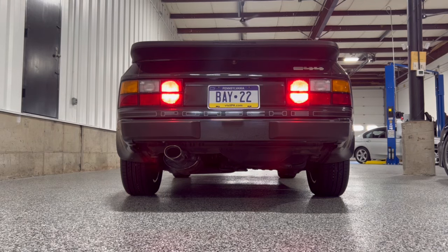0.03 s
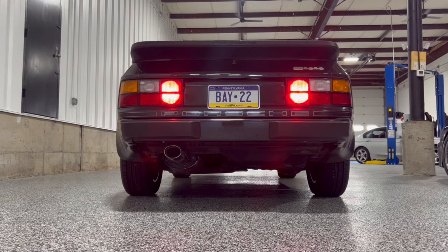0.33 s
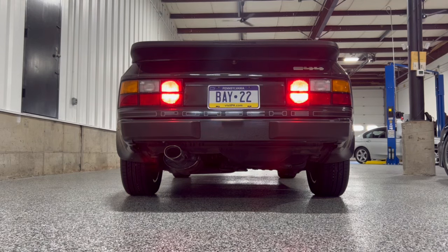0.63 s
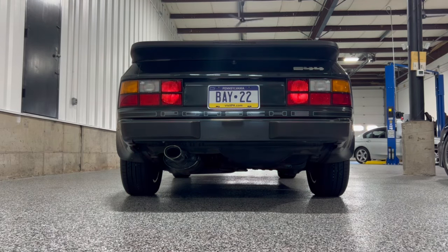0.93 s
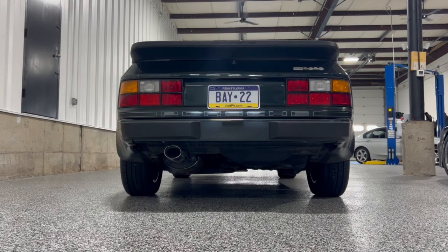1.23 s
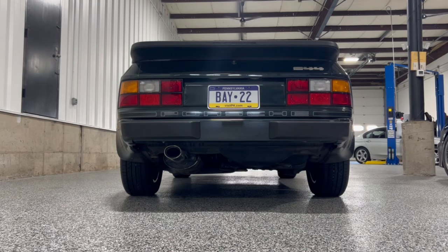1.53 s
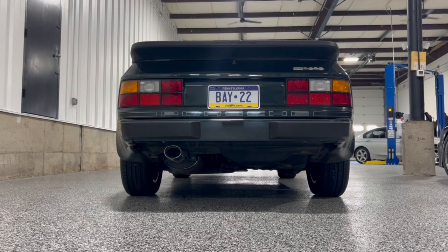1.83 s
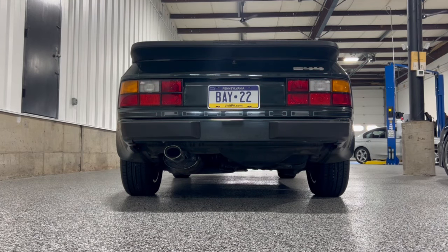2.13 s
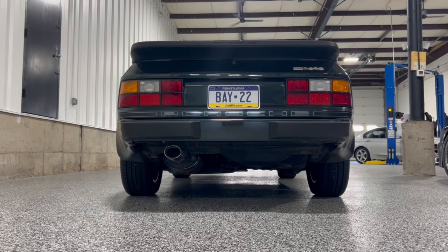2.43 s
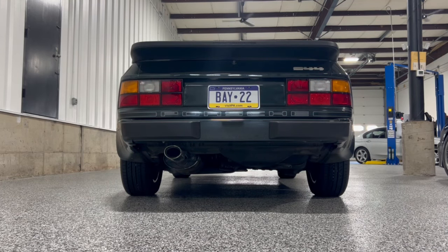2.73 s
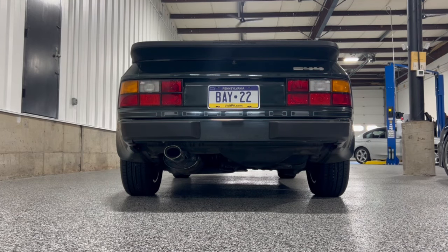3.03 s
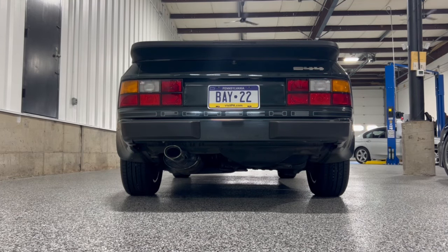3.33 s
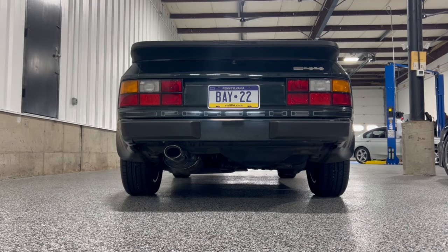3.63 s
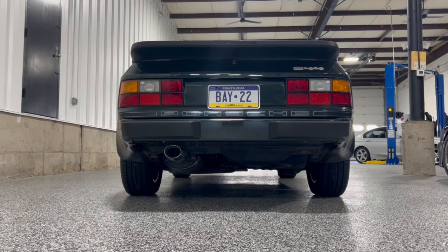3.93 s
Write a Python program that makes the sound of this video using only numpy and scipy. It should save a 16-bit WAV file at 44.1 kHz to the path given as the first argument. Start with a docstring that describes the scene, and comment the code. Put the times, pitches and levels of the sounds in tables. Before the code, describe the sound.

A car engine idles, then shuts off, followed by clacks and dull thuds in a workshop.

```python
"""A car is switched off in a workshop

A four-cylinder car idles, heard from behind: its firings make the tailpipe throb and burble, while
belts whirr and valves tick. It is switched off, turns over a few more times, puffing without firing,
and comes to rest with a clunk. Latch-like clacks and dull thuds follow over the hum of the large hall."""
import sys
import numpy as np
from scipy import signal
from scipy.fft import rfft, irfft
from scipy.io import wavfile
from scipy.ndimage import uniform_filter1d

SR = 44100
rng = np.random.default_rng(int(sys.argv[2]) if len(sys.argv) > 2 else 0)


def wav_out(sig):
    """Save sig, one row per channel (or a flat mono array), as 16-bit PCM at SR to the path in sys.argv[1]."""
    wavfile.write(sys.argv[1], SR, np.round(np.clip(np.atleast_2d(sig).T, -1, 1) * 32767).astype(np.int16))


N = 176400
T = np.arange(N) / SR


def from_db(db):
    return 10 ** (np.asarray(db) / 20)


def rms_one(x):
    """Scale a signal so that its average power is 1."""
    return x / np.sqrt(np.mean(x ** 2) + 1e-20)


def in_time(rows):
    """Join (time, values...) rows into one curve per value column."""
    times, *columns = np.transpose(rows)
    return [np.interp(T, times, column) for column in columns]


def at_hz(points, hz):
    """Read between (frequency, value) points on a musical pitch scale."""
    frequencies, values = np.transpose(points)
    return np.interp(np.log(hz + 1), np.log(frequencies), values)


def drift(per_s):
    """A slow random wobble, about 1 in size."""
    knots = rng.standard_normal(400)
    return np.interp(T * per_s, np.arange(len(knots)), knots)


def dying(start, t60):
    """Stay at 1 until start, then fade by 60 dB every t60 seconds (the fade time)."""
    return from_db(-60 * np.maximum(T - start, 0) / t60)


def noise(spectrum=None):
    """Stereo noise of a given colour: alike on both sides in the bass, wider higher up,
    opposite near 9.5 kHz and alike again near 13 kHz, with a few short echoes."""
    # how alike left and right are: (frequency [Hz], likeness [1 = same, -1 or less = opposite])
    likeness = [(60, 0.86), (170, 0.77), (420, 0.87), (730, -0.061), (1200, 0.35), (1970, 0.19),
                (5400, -0.019), (8500, 0.13), (9300, -1.13), (10100, -1.01), (11000, 0.076), (12300, 0.63),
                (13700, 1), (14300, -0.049)]
    echo_delays_s = (.0017, .0031, .0052, .0083)
    echo_share = .35
    hz = np.arange(N // 2 + 1) * SR / N
    alike = np.clip(at_hz(likeness, hz), -1, 1)
    mid, diffuse = rfft(rng.standard_normal((2, N)))
    echoes = sum((-1) ** k * np.exp(-2j * np.pi * hz * s) for k, s in enumerate(echo_delays_s))
    side = np.sqrt(echo_share / len(echo_delays_s)) * echoes * mid + np.sqrt(1 - echo_share) * diffuse
    both = np.sqrt(1 + alike) * mid + np.sqrt(1 - alike) * side * [[1], [-1]]
    if spectrum is not None:
        top_hz = spectrum[-1][0]
        both = both * from_db(at_hz(spectrum, hz)) / (1 + (hz / top_hz / 2) ** 4)
    return rms_one(irfft(both, N))


def band(x, low_hz, high_hz, order=2):
    """Keep one range of frequencies, at power 1."""
    sos = signal.butter(order, [low_hz, high_hz], "band", fs=SR, output="sos")
    return rms_one(signal.sosfilt(sos, x))


def evened(x):
    """Flatten the random swells of a narrow band of noise."""
    power = uniform_filter1d(np.mean(x ** 2, axis=0), size=900)
    return rms_one(x / np.sqrt(power + .3))


def bursts(cycles, delay, length, depth, uneven_db):
    """One burst of uneven strength per cycle over a steady part; delay, rise and length are in cycles."""
    rise = .07
    number, age = np.divmod(cycles - delay + rise / 2 + 8, 1)
    strength = from_db(uneven_db * rng.standard_normal(2000))[number.astype(int)]
    edges = np.clip(np.minimum(age, 1 - age) / rise, 0, 1)
    return rms_one(1 + depth * strength * edges * np.exp(-age / length))


def struck(hits, tones, soft_hz):
    """Short pushes set an object's own tones ringing; the sound is dulled above soft_hz."""
    times, hit_db = np.transpose(hits)
    pushes, out = np.zeros(N) + 1e-18, 0
    pushes[(times * SR).astype(int)] = from_db(hit_db)
    for hz, db, t60 in tones:
        decay, angle = from_db(-60 / (t60 * SR)), 2 * np.pi * hz / SR  # per sample
        feedback = [1, -2 * decay * np.cos(angle), decay ** 2]
        out = out + from_db(db) * signal.lfilter([0, np.sin(angle)], feedback, pushes)
    return signal.sosfilt(signal.butter(2, soft_hz, fs=SR, output="sos"), out)


def resonances(tones):
    """A rough flow keeps narrow tones ringing, each straying about half a percent in pitch."""
    rush, out = noise(), 0
    for hz, width, db in tones:
        clock = T + .005 * np.cumsum(drift(14)) / SR
        ring = band(rush, hz - width / 2, hz + width / 2)
        straying = np.array([np.interp(clock, T, side) for side in ring])
        out = out + from_db(db) * evened(straying)
    return out


def hall_hum():
    """The hall's steady, deep background noise."""
    # colour of the hum: (frequency [Hz], level [dB])
    colour = [(20, -30), (40, -7), (72, 4), (150, -7.5), (250, -16), (450, -16.5), (750, -20.5),
              (1230, -19), (2400, -35), (4000, -41), (7000, -56.5), (9000, -59.5), (12000, -52.5),
              (15000, -63)]
    return from_db(-44.5) * noise(colour)


def squeaks():
    """Thin, brief squeaks: narrow bands of noise that start fast and fade."""
    # each squeak: (time [s], length [s], pitch [Hz], width [Hz], level [dB])
    events = [(0.795, 0.057, 1104, 11, -35.5), (2.165, 0.071, 5830, 500, -73),
              (3.816, 0.07, 5960, 140, -71)]
    rush, out = noise(), 0
    for start, length, hz, width, db in events:
        tone = evened(band(rush, hz - width / 2, hz + width / 2))
        onset = np.clip((T - start) / 0.009, 0, 1)
        out = out + from_db(db) * tone * onset * np.exp(-((T - start) / length) ** 2)
    return out


def hiss():
    """The clunk at standstill leaves a fading hiss with a high metallic ring in it."""
    # colour of the hiss: (frequency [Hz], level [dB])
    colour = [(1800, 0), (8500, -12), (12000, -18.5), (15000, -26)]
    clunk_s = 1.592
    ring = from_db(-62.5) * band(noise(), 6150, 6880) * dying(clunk_s, t60=1.1)
    rush = from_db(-52) * noise(colour) * dying(clunk_s, t60=0.93)
    return (T >= clunk_s) * (ring + rush)


def thuds():
    """Dull bumps ring a panel; the heaviest come with a low shuffling swell."""
    # each bump: (time [s], level [dB])
    bumps = [(1.835, -29.5), (1.868, -25.5), (2.795, -33), (3.232, -27.5), (3.258, -24), (3.275, -25.5),
             (3.332, -16), (3.378, -22), (3.412, -24), (3.485, -30.5), (3.70, -36)]
    # the panel's tones: (pitch [Hz], level [dB], fade time [s])
    panel = [(62, -8.5, 0.21), (91.1, -5, 0.17), (126, -8.5, 0.093), (195, -22, .06)]
    # colour of the shuffle: (frequency [Hz], level [dB])
    shuffle = [(40, -13), (120, 2.5), (230, 1), (400, -15), (550, -22.5), (800, -63), (2000, -72)]
    peak_s, rise_s, fall_s = 3.345, 0.029, 0.034
    swell = np.exp(np.minimum((T - peak_s) / rise_s, (peak_s - T) / fall_s))
    return struck(bumps, panel, soft_hz=420) + from_db(-22) * swell * noise(shuffle)


def clacks():
    """Metal parts meet in a short rattle of contacts, and the hall rings on after each clack."""
    # each clack: (time [s], rise [s], fade time [s], low [dB], middle [dB], high [dB], top [dB])
    events = [(1.19, 0.0051, 0.13, -43.5, -38.5, -43, -61), (1.309, 0.0075, 0.21, -44, -42.5, -50, -76),
              (1.591, 0.014, 0.21, -33.5, -48, -49, -52), (2.248, 0.011, 0.17, -40.5, -49, -51, -95),
              (2.874, 0.0064, 0.12, -38.5, -33, -37, -53.5), (3.081, 0.016, 0.11, -36, -34.5, -43, -78),
              (3.143, 0.01, 0.15, -35, -40.5, -43.5, -51.5), (3.936, 0.024, 0.19, -41.5, -49, -52.5, -65)]
    # those four ranges: (low edge [Hz], high edge [Hz], hall fade time [s], hall level [dB])
    ranges = [(165, 665, 0.59, -15.5), (793, 2840, 0.92, -15.5), (2840, 5200, 1.1, -16.5),
              (6000, 13500, 0.96, -18.5)]
    # colour of the metal parts: (frequency [Hz], level [dB])
    colour = [(160, 5), (250, 1), (440, -8), (650, -1.5), (1240, 8), (2300, -0.5), (3700, -4), (5100, -7.5),
              (7300, -7), (8800, -14.5), (11500, -8.5), (15000, -19)]
    contacts_per_s = 170
    out, body = 0, noise(colour)
    for k, (low_hz, high_hz, hall_t60, hall_db) in enumerate(ranges):
        near_power, hall_power = 0, 0
        for start, rise, t60, *levels in events:
            onset = from_db(levels[k]) * np.clip((T - start) / rise, 0, 1)
            near_power += (onset * dying(start, t60)) ** 2
            hall_power += (onset * dying(start, hall_t60) * from_db(hall_db)) ** 2
        rattle = bursts(T * contacts_per_s, delay=0, length=.3, depth=.6, uneven_db=2)
        loudness = np.sqrt(near_power * rattle ** 2 + hall_power)
        out = out + band(body, low_hz, high_hz, order=3) * loudness
    return out


def snaps():
    """Hard contacts in the clacks: a crack, and a metal ring that reaches each side by two paths."""
    # each contact: (time [s], ring level [dB], crack level [dB])
    contacts = [(1.592, -65, -43), (1.599, -62, -54), (2.876, -41, -49), (2.882, -46.5, -52),
                (3.088, -46, -66), (3.15, -54.5, -53), (3.156, -48, -50)]
    # the metal's tones: (pitch [Hz], level [dB], fade time [s])
    latch = [(910, -6.5, 0.15), (1198, -7, 0.14), (1465, -3.5, 0.097), (1887, -7, 0.17), (2093, -3.5, .08),
             (2580, -14, .14), (3590, -22, .12)]
    path_spread_s = .004
    crack = sum(from_db(db) * (T >= s) * dying(s, t60=.016) for s, _, db in contacts)
    rings = []
    for side in range(2):
        hits = [(s + delay, db) for s, db, _ in contacts for delay in rng.uniform(0, path_spread_s, 2)]
        rings.append(struck(hits, latch, soft_hz=12000))
    return crack * band(noise(), 1400, 12000) + np.array(rings)


def engine_noise(turns):
    """Gas burbles at each firing, belts and engine block whirr, and valves tick between the firings."""
    # how loud the engine's noise is: (time [s], middle level [dB], treble level [dB])
    effort = [(0, -0.5, 1), (.5, -0.5, 0), (.76, -0.5, 1), (.84, -2, -5), (.93, -4.5, -8), (1.1, -4.5, -10),
              (1.27, -12.5, -18.5), (1.5, -21.5, -29), (1.8, -25.5, -34), (2.3, -60, -65)]
    # colours of the gas, the belts and the valves: (frequency [Hz], level [dB])
    gas_colour = [(150, 1.5), (250, -10.5), (360, -9.5), (520, -9), (900, -20), (2000, -48)]
    belt_colour = [(200, 2.5), (600, -3.5), (820, -3), (940, -1), (1200, -2.5), (1850, -1), (2400, -9),
                   (4000, -9), (8000, -61)]
    valve_colour = [(1000, -8), (2500, -4), (3500, -6), (4900, 0), (6200, -3.5), (7600, -10.5),
                    (8700, -13.5), (11300, -10), (13000, -12.5), (14200, -17.5), (15500, -39)]
    # tones of the silencer and of the engine block: (pitch [Hz], width [Hz], level [dB])
    silencer = [(441.3, 11, -43), (611, 25, -50), (738.4, 13, -50)]
    block = [(825, 52, -50), (1128.4, 33, -46.5), (1248, 61, -48), (1542, 22, -52.5), (1760, 39, -49.5)]
    middle, treble = from_db(in_time(effort))
    firings = 2 * turns  # four cylinders fire twice per turn
    gas = from_db(-39) * band(noise(gas_colour), 210, 3000, order=3)
    gas *= bursts(firings, delay=-0.15, length=0.67, depth=1.8, uneven_db=0.5)
    burble = gas + resonances(silencer)
    burble *= bursts(2 * firings, delay=0, length=0.98, depth=1.2, uneven_db=3)
    whirr = from_db(-35.5) * noise(belt_colour)
    whirr *= bursts(2 * firings, delay=0.7, length=0.5, depth=0.77, uneven_db=2)
    valves = from_db(-38) * noise(valve_colour)
    valves *= bursts(firings, delay=.68, length=0.27, depth=0.82, uneven_db=3)
    return middle * (whirr + resonances(block)) + treble * valves + np.sqrt(middle * treble) * burble


def exhaust(turns):
    """The throb of the firings dies at switch-off; a sinking hum remains as unfired puffs ring the pipe."""
    # tones of the idle throb: (pitch [cycles per turn], relative level [dB])
    idle_tones = [(2, -18), (3, -22), (4, 1.5), (5, -47), (6, -8), (7, -18.5), (8, -16), (9, -23.5),
                  (10, -30), (12, -24)]
    # tones of the unfired engine: (pitch [cycles per turn], level [dB], fade [dB/s])
    coast_tones = [(4, -24, 50), (6, -23, 55), (8, -17.5, 85)]
    # puffs as the engine runs down: (time [s], level [dB])
    puffs = [(.903, -18.5), (.938, -21.5), (.987, -22), (1.087, -24.5), (1.168, -32), (1.275, -31.5),
             (1.385, -37), (1.525, -37.5)]
    # the tailpipe's tones: (pitch [Hz], level [dB], fade time [s])
    pipe = [(36.3, -17, 0.42), (61.2, -1, 0.5), (74.8, 2.5, 0.43), (110, -9, 0.36)]
    switch_off_s, throb_fade_db_per_s = 0.77, 146
    since_off = np.maximum(T - switch_off_s, 0)
    firing = from_db(-throb_fade_db_per_s * since_off)
    throb, coast = 0, 0
    for per_turn, db in idle_tones:
        waver_db = .7 * drift(10.7) * (db < -5)  # only the weaker tones
        throb -= from_db(db + waver_db) * np.sin(2 * np.pi * per_turn * turns)
    for per_turn, db, fade in coast_tones:
        waver_db = 1.5 * drift(8.1)
        coast -= from_db(db - fade * since_off + waver_db) * np.sin(2 * np.pi * per_turn * turns)
    throb = from_db(-13.5 + .5 * drift(9.7)) * rms_one(throb)
    return firing * throb + (1 - firing) * coast + struck(puffs, pipe, soft_hz=140.3)


def scene():
    """The hall's hum, the car and the small sounds after it."""
    # how fast the engine's crankshaft spins: (time [s], speed [turns/s])
    crank_speed = [(0, 15.7), (.22, 16.4), (.5, 15.74), (.66, 16.3), (.78, 15.9), (.84, 13.9), (.92, 12.1),
                   (1.02, 10.8), (1.3, 8.8), (1.45, 7), (1.58, 1)]
    first_firing_s = .0404
    speed, = in_time(crank_speed)
    turns = np.cumsum(speed) / SR - first_firing_s * speed[0]
    mix = (hall_hum() + exhaust(turns)) * from_db([[.4], [-.4]])  # barely to the left
    mix += thuds() * from_db([[2], [-2]])  # further left
    mix += engine_noise(turns) + clacks()
    for _ in range(2):  # two layers, each with its own randomness
        mix += snaps() + hiss()
    return mix + squeaks()


def record(dry):
    """The microphone drops the deepest bass and the highest treble."""
    bass_cut = signal.butter(4, 23, "high", fs=SR, output="sos")
    treble_cut = signal.ellip(10, .1, 80, 15100, fs=SR, output="sos")
    return signal.sosfilt(treble_cut, signal.sosfilt(bass_cut, dry))


dry = scene()
out = record(dry)
wav_out(out)
```